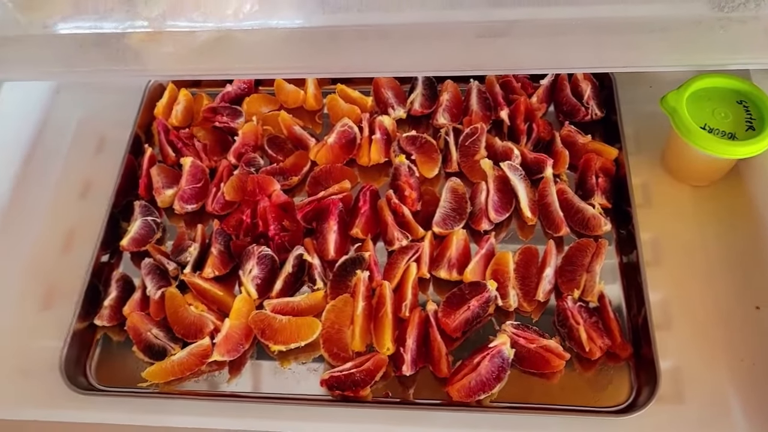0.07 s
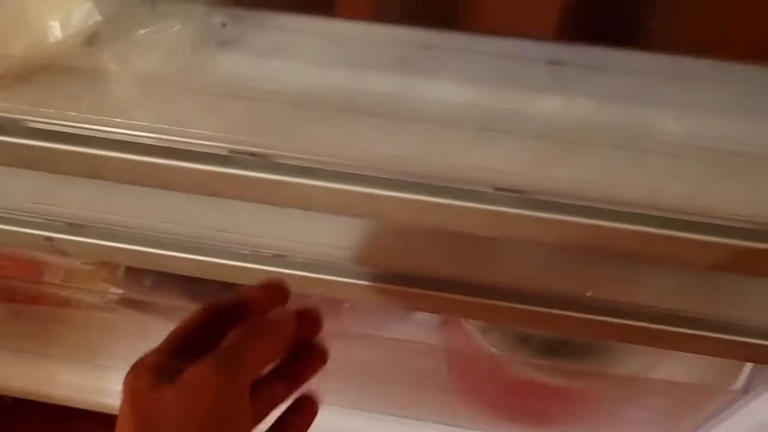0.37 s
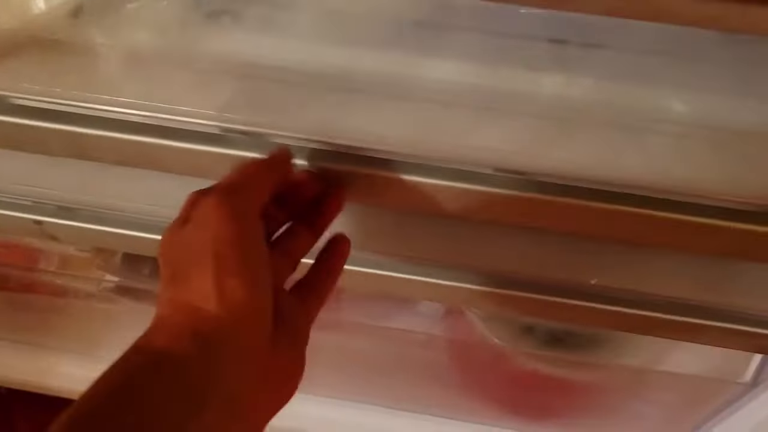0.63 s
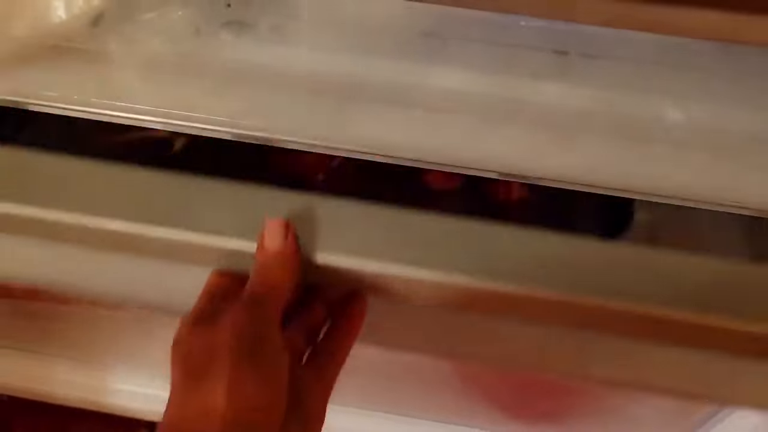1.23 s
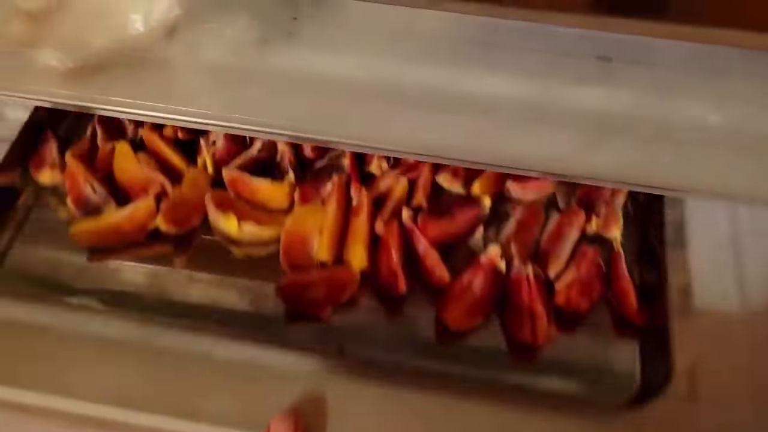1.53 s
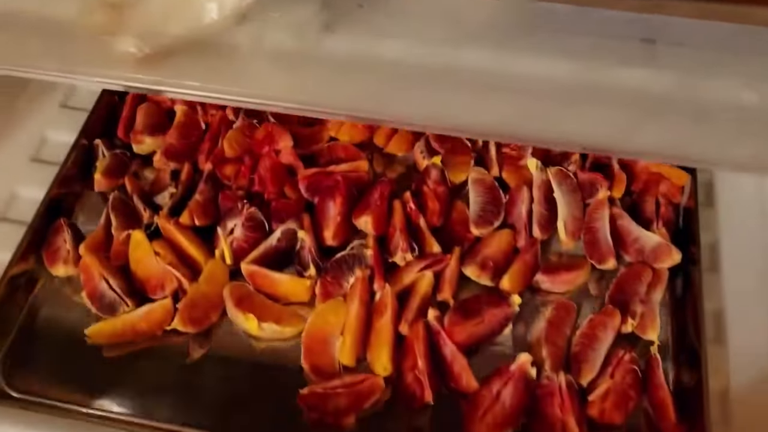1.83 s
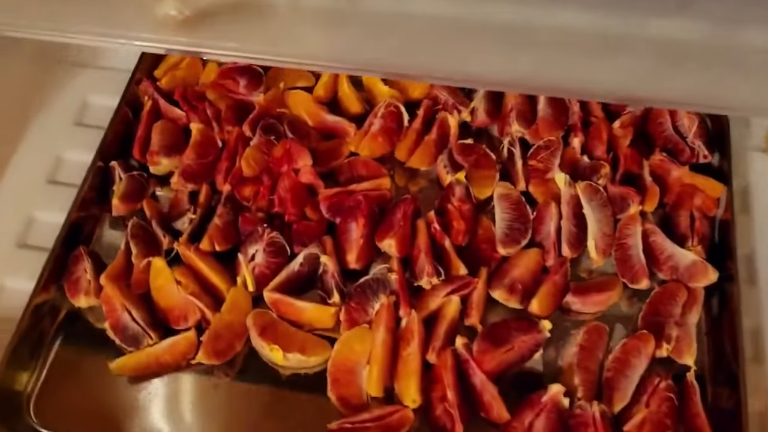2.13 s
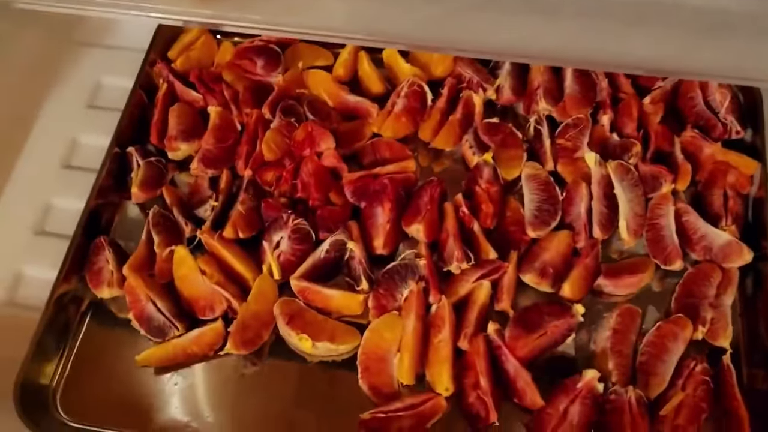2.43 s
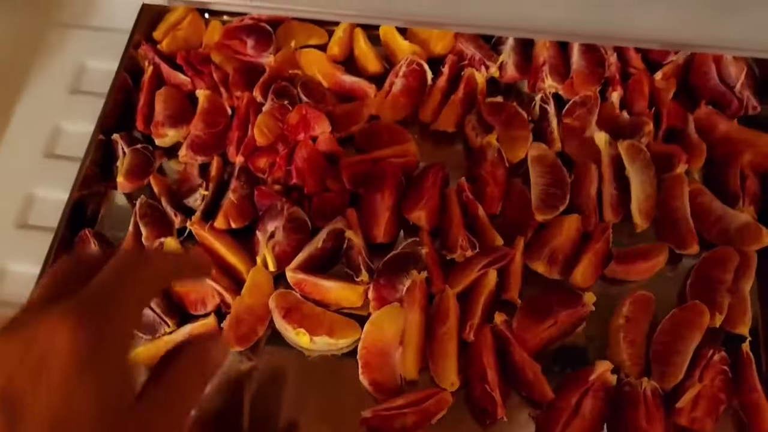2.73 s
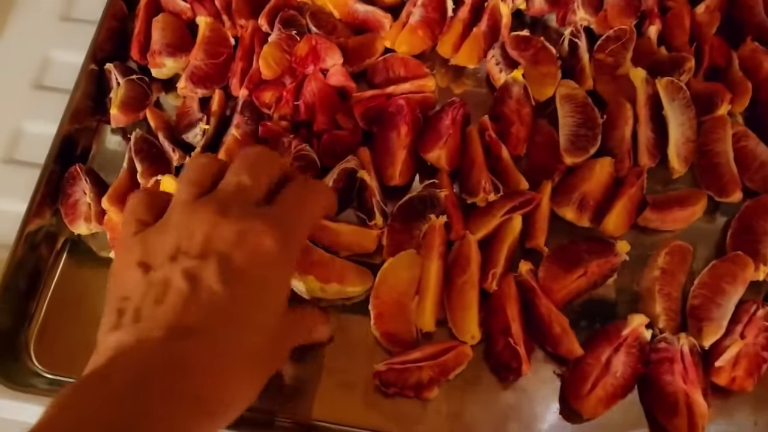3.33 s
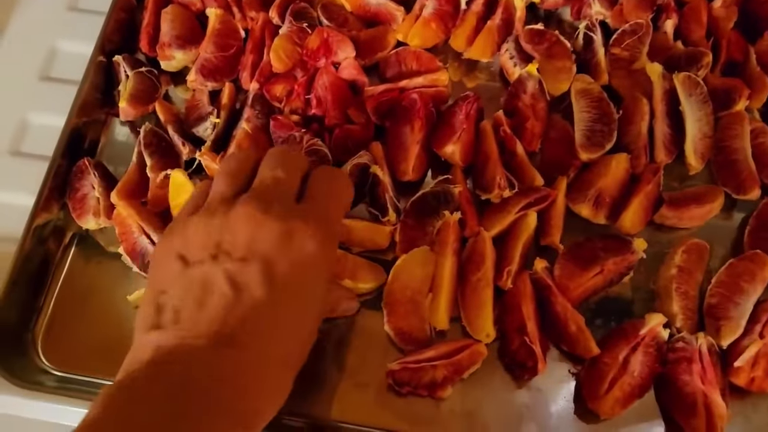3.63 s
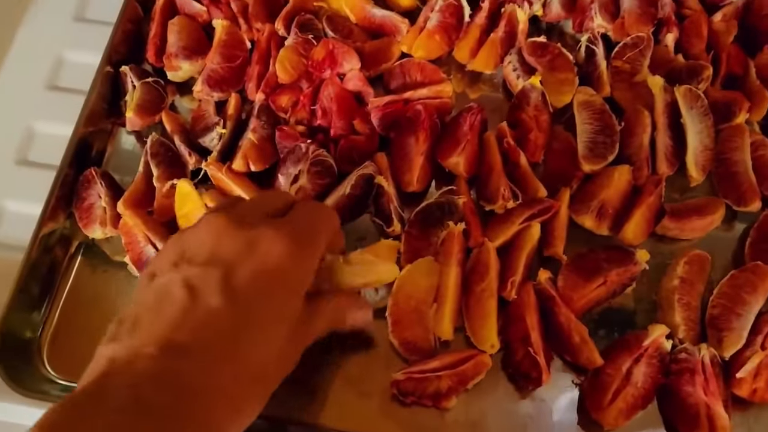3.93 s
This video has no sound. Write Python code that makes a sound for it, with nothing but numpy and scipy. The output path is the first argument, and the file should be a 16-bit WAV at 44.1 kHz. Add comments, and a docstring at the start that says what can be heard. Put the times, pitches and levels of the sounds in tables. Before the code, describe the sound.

A plastic freezer drawer rolls open close by, with finger taps, a frosty crack, rumbling and a thud at its stop. Then frozen fruit snaps off a metal tray with a ringing clack, over a faint kitchen hum.

```python
"""A freezer hums in a quiet kitchen, close to a stereo pair of microphones; near the start the sound drops
out briefly. Fingers tap the drawer's plastic front and the frosted seal crackles free. The drawer
rumbles out, rollers drumming its bin and rails hissing, and booms against its stop. A soft swish keeps
repeating. Then a frozen fruit slice snaps off a metal baking tray with a sharp, ringing clack,
and loose pieces settle."""
import sys
import numpy as np
from scipy import signal
from scipy.fft import rfft, irfft, next_fast_len
from scipy.io import wavfile
from scipy.ndimage import map_coordinates

SR = 44100
rng = np.random.default_rng(int(sys.argv[2]) if len(sys.argv) > 2 else 0)


def master_out(mix):
    """Clip the mix to full scale and print it as 16-bit PCM to the path in sys.argv[1]."""
    frames = np.transpose(np.atleast_2d(mix))
    ceiling = np.clip(frames, -1, 1)
    pcm = np.round(ceiling * 32767).astype(np.int16)
    wavfile.write(sys.argv[1], SR, pcm)


N = 4 * SR
DROPOUT_FROM_S, DROPOUT_TO_S = 0.1643, 0.4126
BOOM_ATTACK_S, DRAWER_BOOM_DB = 0.0088, -0.5

# How alike the two microphones hear the kitchen. Each row: frequency in Hz, left-right correlation.
MIC_LIKENESS = [(60, 0.98), (200, 0.96), (380, 0.54), (700, 0.16), (1300, -0.11), (2500, -0.37),
                (15000, 0.22)]
# Modes of the cabinet and the plastic bin. Each row: frequency in Hz, relative level in dB, t60 in seconds.
CABINET_MODES = [(63.5, -13, 0.4), (94.8, 3, 0.32), (236.2, -7.5, 0.23)]
BIN_MODES = [(272, -3, .18), (312, -1, .18), (360, -3, .18), (560, -7, .1), (640, -4, .09), (775, 2, .08),
             (942, -13, .12), (1323, -14, .14), (1749, -17, .12), (2315, -21, .12), (2553, -22, .12)]


def amp(db):
    """Decibels to gain."""
    return 10 ** (np.asarray(db) / 20)


def unit(x):
    """x at rms 1."""
    return x / np.sqrt(np.mean(x ** 2) + 1e-20)


def along(points, hz):
    """(Hz, value) points read on a log axis."""
    freqs, values = np.transpose(points)
    return np.interp(np.log(hz + 1), np.log(freqs + 1), values)


def wobble(rate):
    """A smooth random curve, rate knots a second."""
    return map_coordinates(rng.standard_normal(int(N * rate / SR) + 4), [np.arange(N) * rate / SR])


def swell(middle_s, half_s):
    """A bell-shaped rise and fall."""
    return np.exp(-.5 * ((np.arange(N) / SR - middle_s) / half_s) ** 2)


def add(track, s, sound):
    """Mix a sound into a track at time s."""
    part = track[:, round(s * SR):][:, :sound.shape[-1]]
    part += sound[..., :part.shape[1]]


def colour(x, points, tilt_db=0):
    """Causal filter through (Hz, dB) points, tilted per octave."""
    n = x.shape[-1]
    size = 2 * next_fast_len(n // 2 + 4096)
    hz = np.fft.rfftfreq(size, 1 / SR)
    cepstrum = irfft(np.log(amp(along(points, hz) + tilt_db * np.log2(1 + hz / 300))))
    cepstrum[1:size // 2] *= 2  # fold to minimum phase
    cepstrum[size // 2 + 1:] = 0
    return irfft(rfft(x, size) * np.exp(rfft(cepstrum)))[..., :n]


def mic_angle(hz):
    """Half the phase gap between the microphones, in radians."""
    return np.arccos(np.clip(along(MIC_LIKENESS, hz), -1, 1)) / 2


def spread(pair):
    """Two unrelated signals at the microphones: alike in the bass, apart in the treble."""
    n = pair.shape[-1]
    angle = mic_angle(np.fft.rfftfreq(n, 1 / SR))
    mid, side = irfft(rfft(pair) * [np.cos(angle), np.sin(angle)], n)
    return np.array([mid + side, mid - side])


def blow(points, tilt_db, t60, room_db):
    """One close contact: a fast dying burst of dense resonances, then the kitchen's softer answer."""
    # The kitchen's decay. Each row: frequency in Hz, t60 in seconds.
    room_t60 = [(100, 0.47), (300, 0.37), (1000, 0.31), (3000, 0.4), (7000, 0.22), (15000, 0.27)]
    t = np.arange(SR * 3 // 4) / SR
    burst = unit(rng.standard_normal((2, len(t))) * amp(-60 * t / t60) * (1 - np.exp(-t / 0.00028)))
    hz, s, spectra = signal.stft(rng.standard_normal((2, len(t))), SR, nperseg=256)
    spectra *= amp(-60 * s / along(room_t60, hz)[:, None])
    tail = signal.istft(spectra, SR, nperseg=256)[1][:, :len(t)]
    room = amp(room_db) * unit(tail * (1 - np.exp(-t / 0.008)))
    sound = colour(spread(burst + room), points, tilt_db)
    return unit(sound) * np.sqrt(.01 / t[-1])  # the energy of 10 ms at rms 1


def ring(modes, attack_s, scatter_db=0, apart=0):
    """Damped modes; with apart above 0 the higher ones reach the microphones out of step."""
    t, out = np.arange(SR) / SR, 0
    for hz, db, t60 in modes:
        phase = apart * (mic_angle(hz) * np.array([[1], [-1]]) + rng.uniform(-np.pi, np.pi))
        decay = amp(db + scatter_db * rng.normal() - 60 * t / t60)
        out = out + decay * np.sin(2 * np.pi * hz * t + phase)
    return out * (1 - np.exp(-t / attack_s))


def freezer():
    """Room tone: fan noise, duller before the dropout, and a wavering compressor hum."""
    # Fan and kitchen air, then the compressor's tones. Each row: frequency in Hz, relative level in dB.
    air_colour = [(15, -51), (25, -17), (43, -16.5), (87, 5), (120, -6.5), (153, -9), (363, -15.5),
                  (427, -23), (714, -23.5), (936, -31), (2000, -38), (2990, -32.5), (4610, -45.5),
                  (6740, -42), (16000, -68)]
    hum_tones = [(96, -54), (145, -58.5), (188, -68), (285, -65), (368, -69)]
    t = np.arange(N) / SR
    air = amp(-50.5) * unit(colour(spread(rng.standard_normal((2, N))), air_colour))
    dull_air = amp(0.5) * colour(air, [(100, 0.0), (400, 1.0), (1500, -4.5), (5000, -29), (12000, -15)])
    hum = sum(amp(db + 1.5 * wobble(13)) * np.sin(2 * np.pi * hz * t + 1.2 * wobble(1.99))
              for hz, db in hum_tones)
    return np.where(t < (DROPOUT_FROM_S + DROPOUT_TO_S) / 2, dull_air, air) + hum


def finger_taps():
    """Fingers tap the drawer's plastic front and the cabinet booms behind it."""
    # Each row: start in seconds, level in dB, tilt in dB per octave, relative boom level in dB.
    taps = [(0.514, -39, -1, -59), (0.521, -37.5, 2, -42), (.580, -37.5, 1, -47), (.810, -54.5, -3, -41),
            (.870, -52, -6.5, -79), (1.004, -48.5, -0.5, -61)]
    # A tap's spectrum. Each row: frequency in Hz, gain in dB.
    tap_colour = [(100, -3), (300, -0.5), (700, 2), (1100, -8), (1700, -7.5), (2300, -2.5), (3200, 0),
                  (4100, -8), (4900, -18), (8000, -22.5), (15000, -53)]
    out = np.zeros((2, N))
    boom = amp(DRAWER_BOOM_DB) * ring(CABINET_MODES, BOOM_ATTACK_S)
    for s, db, tilt, boom_db in taps:
        add(out, s, amp(db) * blow(tap_colour, tilt, t60=0.051, room_db=-9))
        add(out, s, amp(boom_db) * boom)
    return out


def bin_flex():
    """The bin flexes with one low note under a push, or as rollers drop into dips of the rails."""
    # Each row: start in seconds, level in dB, pitch in Hz.
    flexes = [(0.52, -28, 122), (1.238, -31.5, 193), (1.296, -33.5, 313.5), (1.428, -30.5, 340),
              (1.477, -23.5, 287), (1.498, -23, 328), (1.621, -18, 290), (1.727, -23.5, 265.7)]
    t60 = 0.16
    out = np.zeros((2, N))
    for s, db, hz in flexes:
        add(out, s, ring([(hz, db, t60)], attack_s=0.0018, apart=0.34))
    return out


def soft_swishes():
    """A soft, grainy swish that repeats."""
    # Each row: middle in seconds, half length in seconds, level in dB, tilt in dB per octave.
    swishes = [(0.795, 0.022, -64, 2), (0.988, 0.03, -67, 0), (1.822, 0.056, -59, -2),
               (2.055, .025, -70.5, 11), (2.357, 0.031, -60.5, 1.5), (2.605, 0.033, -67.5, 3.5),
               (2.926, 0.049, -67, 4), (3.207, 0.036, -58.5, -2), (3.35, 0.013, -66, -5),
               (3.485, 0.045, -58, -3)]
    # A swish's spectrum. Each row: frequency in Hz, gain in dB.
    swish_colour = [(400, -6), (1500, -5), (2700, 1), (4500, -6.5), (7500, -8), (10000, -23), (15000, -35)]
    grain = spread(rng.standard_normal((2, N)) * amp(2 * wobble(140)))
    return sum(amp(db) * swell(s, half) * unit(colour(grain, swish_colour, tilt))
               for s, half, db, tilt in swishes)


def scrapes():
    """Handle and rails catch in short chattering slips, each through one resonance of the plastic."""
    # Each row: middle in seconds, half length in seconds, level in dB, pitch in Hz.
    slips = [(0.807, .004, -62, 2680), (0.872, 0.0024, -59, 2200), (0.928, 0.0032, -42.5, 1300),
             (1.188, 0.0089, -48, 2900), (1.292, 0.0098, -41.5, 2540), (1.324, 0.0087, -44, 2230),
             (1.419, 0.0036, -47.5, 2100), (1.457, 0.011, -42, 1800), (1.512, 0.021, -54.5, 2680),
             (1.641, 0.0063, -39, 1310)]
    relative_width, chatter_per_s, chatter_db = 0.07, 300, 1.5
    chatter = rfft(spread(rng.standard_normal((2, N)) * amp(chatter_db * wobble(chatter_per_s))))
    out = np.zeros((2, N))
    for s, half, db, hz in slips:
        ratio = np.fft.rfftfreq(N, 1 / SR) / hz
        resonance = 1j * ratio / (1 - ratio ** 2 + 1j * ratio * relative_width)
        out += amp(db) * swell(s, half) * unit(irfft(chatter * resonance, N))
    return out


def drawer_knocks():
    """The drawer shifts, jolts over rail joints and hits its stop; bin, front and cabinet ring."""
    # Each row: start in seconds, level in dB, tilt in dB per octave, relative boom and front levels in dB.
    knocks = [(0.895, -48.5, -1, -48, -47), (0.923, -38.5, 2.5, -57, -39), (1.432, -35.5, 1, -52, -35),
              (1.578, -28.5, -1, -24, -19.5), (1.592, -27, 2.5, -48.5, -24), (1.607, -28, 3.5, -28, -24.5),
              (1.623, -29.5, -0.5, -35, -27), (1.642, -29, 1.5, -25, -34), (2.095, -31.5, 6, -36, -30),
              (2.101, -24.5, -1.5, -15.5, -26), (2.169, -26.5, 4.5, -24, -26),
              (2.179, -21.5, 3, -21.5, -39), (2.181, -17.5, -3, -17, -14)]
    # A knock's spectrum. Each row: frequency in Hz, gain in dB.
    knock_colour = [(22, -59), (55, -12), (140, -3), (230, -0.5), (350, 1.5), (480, -6), (620, 1),
                    (800, -1), (950, -8.5), (1500, -15), (3000, -21.5), (5000, -34), (10000, -52),
                    (15000, -67)]
    # The hollow drawer front. Each row: frequency in Hz, relative level in dB, t60 in seconds.
    front_modes = [(585, -10, 0.058), (688, -4.5, 0.061), (772.6, -7.5, 0.087)]
    out = np.zeros((2, N))
    boom = amp(DRAWER_BOOM_DB) * ring(CABINET_MODES, BOOM_ATTACK_S)
    for s, db, tilt, boom_db, front_db in knocks:
        add(out, s, amp(db) * blow(knock_colour, tilt, t60=0.053, room_db=-7))
        add(out, s, amp(db - 13) * ring(BIN_MODES, attack_s=0.0019, scatter_db=4.1, apart=0.79))
        add(out, s, amp(front_db) * ring(front_modes, attack_s=0.0018, scatter_db=4.5, apart=0.4))
        add(out, s, amp(boom_db) * boom)
    return out


def drawer_slide():
    """Rollers drum the bin with many small bumps while the frosted rails hiss."""
    # Course of the rumble and of the hiss. Each row: time in seconds, relative level in dB.
    roll_levels = [(1.1, -62), (1.23, -40.5), (1.3, -38), (1.37, -39.5), (1.44, -36.5), (1.51, -34.5),
                   (1.56, -41), (1.63, -27.5), (1.68, -39.5), (1.8, -43), (1.9, -46.5), (2.05, -52)]
    rail_levels = [(1.02, -66), (1.182, -39), (1.308, -39.5), (1.472, -44.5), (1.6, -50), (1.744, -62),
                   (1.874, -106), (2.09, -45.5)]
    # Their spectra. Each row: frequency in Hz, gain in dB.
    roll_colour = [(25, -39), (45, -37.5), (72, 7), (130, -8.5), (200, -9.5), (290, 4), (360, -7),
                   (460, -12.5), (600, -2.5), (760, -12), (1000, -20.5), (1700, -25), (3000, -36),
                   (6000, -62)]
    rail_colour = [(300, 5), (1200, 7.5), (3200, -0.5), (4300, -1.5), (7500, -5.5), (10500, -25),
                   (13000, -9.5), (16000, -32)]
    bumps_per_s, rise_s, fade_s = 240, 0.021, 0.21
    t = np.arange(N) / SR

    def level(rows):
        """Gain along the rows, fading beyond both ends."""
        s, db = np.transpose(rows)
        fades = np.exp(-np.maximum(s[0] - t, 0) / rise_s - np.maximum(t - s[-1], 0) / fade_s)
        return amp(np.interp(t, s, db)) * fades

    rolling = unit(colour(spread(rng.standard_normal((2, N))), roll_colour))
    bumps = (rng.random(N) < bumps_per_s / SR) * rng.standard_normal((1, N))
    bin_ring = ring(BIN_MODES, attack_s=0.001, apart=0.99)
    drumming = unit(signal.fftconvolve(bumps, bin_ring, axes=1)[:, :N])
    rumble = rolling + amp(-5.5) * drumming
    grain = rng.standard_normal((2, N)) * amp(4 * wobble(320) + 3 * wobble(35.08))
    hiss = unit(colour(spread(grain), rail_colour))
    return amp(2) * level(roll_levels) * rumble + amp(-8.5) * level(rail_levels) * hiss


def frost():
    """Bright cracks of ice giving way."""
    # Each row: start in seconds, level in dB, tilt in dB per octave.
    cracks = [(1.124, -49, -4.5), (1.143, -40.5, -4), (1.153, -30, 0), (1.184, -40, -2.5),
              (1.346, -32.5, 2.2), (1.451, -41.5, -1), (1.884, -51, -2.5), (3.558, -50, 0)]
    # A crack's spectrum. Each row: frequency in Hz, gain in dB.
    crack_colour = [(30, -45), (120, -3), (500, -2), (1300, 1), (3400, 4), (4500, -3), (7000, -2),
                    (10500, -16), (13000, -8.5), (16000, -20)]
    out = np.zeros((2, N))
    for s, db, tilt in cracks:
        add(out, s, amp(db) * blow(crack_colour, tilt, t60=0.057, room_db=-8))
    return out


def fruit():
    """A frozen slice breaks loose and chatters, ringing the tray; light nudges only tick."""
    # Strikes on the tray. Each row: start in seconds, level in dB, tilt in dB per octave, ping in dB.
    clacks = [(3.674, -39, 3, -32), (3.677, -20.5, 4.5, -20), (3.681, -19, 1.5, -19.5),
              (3.6869, -14.5, -1, -32), (3.6916, -16, -2, -23), (3.697, -24, -5.5, -50),
              (3.719, -21, -12, -52), (3.758, -32, 2.5, -49)]
    # Pieces nudged and settling. Each row: start in seconds, level in dB, tilt in dB per octave.
    nudges = [(3.634, -45, -3), (3.79, -31.5, -3.5), (3.838, -41.5, 3.5), (3.867, -32.5, -3.5),
              (3.905, -34.5, -1), (3.994, -43, -1)]
    # Their spectra. Each row: frequency in Hz, gain in dB.
    clack_colour = [(25, -33), (60, -4), (130, -17), (230, 3.5), (400, -3), (550, -3.5), (700, 0),
                    (1400, -2), (1900, -5), (2800, -4.5), (3200, 0.5), (3600, -11), (4000, -11),
                    (6500, -12.5), (10500, -26), (15000, -27)]
    nudge_colour = [(30, -20), (130, -2.5), (250, 1.5), (450, -4.5), (750, 5.5), (1400, -6.5), (2200, -8),
                    (3200, -10.5), (4200, -16.5), (7500, -23), (10500, -33.5), (15000, -31)]
    # The tray, and ice pinging on metal. Each row: frequency in Hz, relative level in dB, t60 in seconds.
    tray_modes = [(170, -17, .4), (216, -9, .3), (236, -5, .42), (307, -2, .36), (452, -12, .3),
                  (696, 1, .14), (743, -8, .28), (942, -10, .2), (1045, -5, .14), (1323, -5, .13),
                  (1430, -5, .16), (1965, -16, .3), (2186, -18, .35)]
    ping_modes = [(3098, -4, .06), (3160, -1, .07), (3218, 2, .07), (3222, -16.5, .42), (3284, -2, .07),
                  (3446, -3, .06), (3617, -5, .06)]
    out = np.zeros((2, N))
    for s, db, tilt, ping_db in clacks:
        add(out, s, amp(db) * blow(clack_colour, tilt, t60=0.046, room_db=-6.5))
        add(out, s, amp(db - 7.5) * ring(tray_modes, attack_s=0.00074, scatter_db=0.78, apart=1))
        add(out, s, amp(ping_db) * ring(ping_modes, attack_s=0.0005, scatter_db=0.57, apart=0.77))
        add(out, s, amp(db - 22) * ring(CABINET_MODES, BOOM_ATTACK_S))
    for s, db, tilt in nudges:
        add(out, s, amp(db) * blow(nudge_colour, tilt, t60=0.06, room_db=-5))
    return out


def scene():
    """The kitchen as it reaches the two microphones."""
    # The drawer's sounds thin out below about 35 Hz. Each row: frequency in Hz, gain in dB.
    low_cut = [(20, -18), (35, 0), (55, -0.5)]
    drawer = finger_taps() + drawer_knocks() + bin_flex() + drawer_slide() + scrapes()
    return freezer() + colour(drawer, low_cut) + frost() + soft_swishes() + fruit()


def record(dry):
    """A brief dropout, a slight lean left in the lows and mids and right in the treble, a band limit."""
    # Balance of the microphones. Each row: frequency in Hz, left minus right in dB.
    balance = [(100, 1), (300, 0.4), (700, 0), (1200, 1.5), (2200, -3.5), (4000, -2), (8000, -0.5),
               (14000, -0.5)]
    top_hz = 15900
    t = np.arange(N) / SR
    gate = np.clip((DROPOUT_FROM_S - t) / 0.013, 0, 1) + np.clip((t - DROPOUT_TO_S) / 0.042, 0, 1)
    hz = np.fft.rfftfreq(2 * N, 1 / SR)
    lean = amp(along(balance, hz) * np.array([[.5], [-.5]]))
    lowpass = 1 / np.sqrt(1 + (hz / top_hz) ** 160)
    return irfft(rfft(dry * gate, 2 * N) * lean * lowpass)[:, :N]


dry = scene()
out = record(dry)
master_out(out)
```